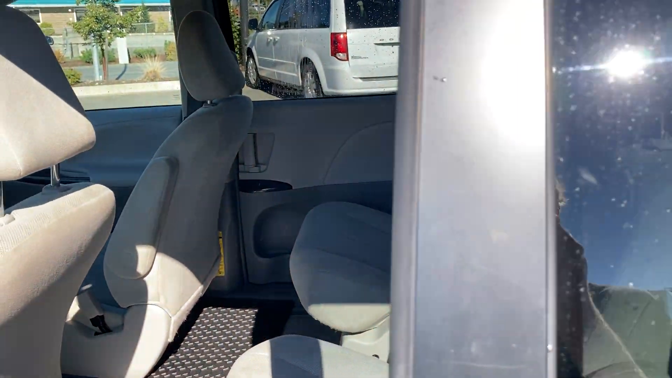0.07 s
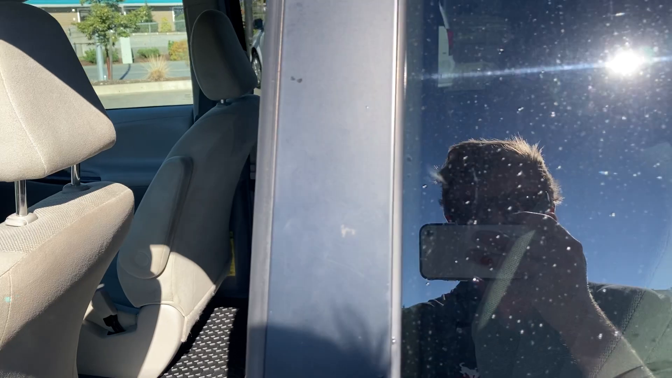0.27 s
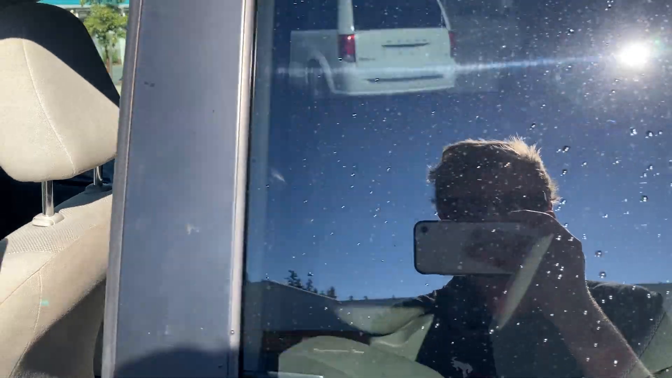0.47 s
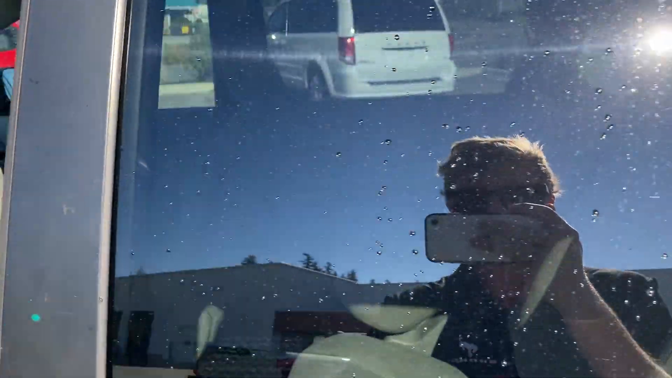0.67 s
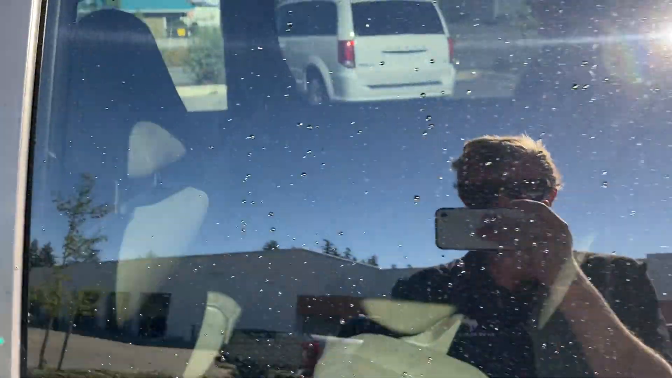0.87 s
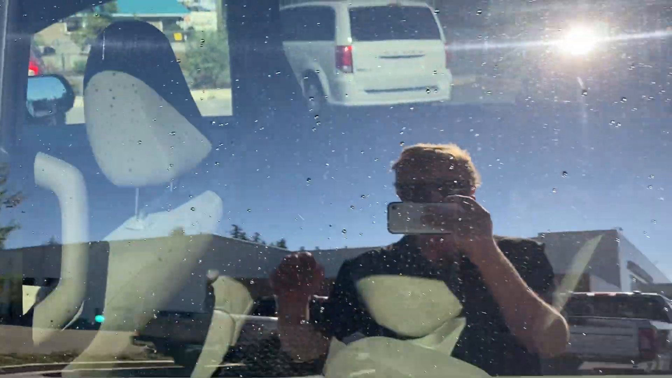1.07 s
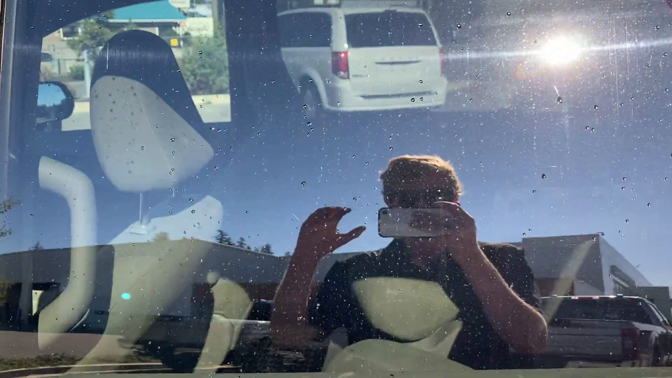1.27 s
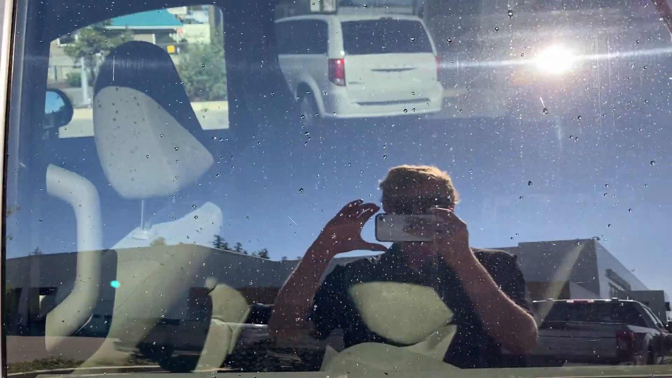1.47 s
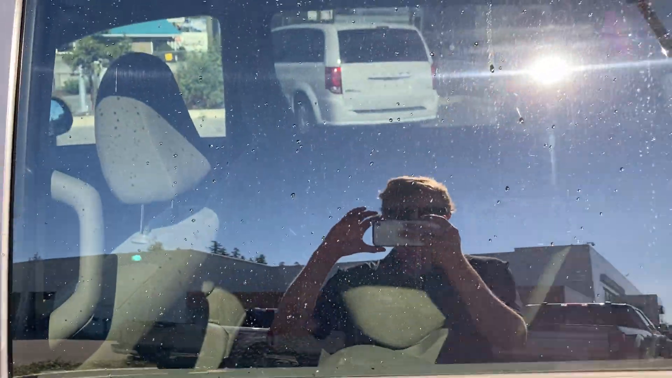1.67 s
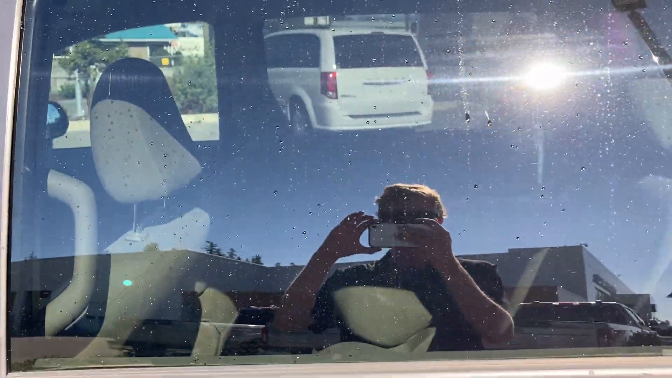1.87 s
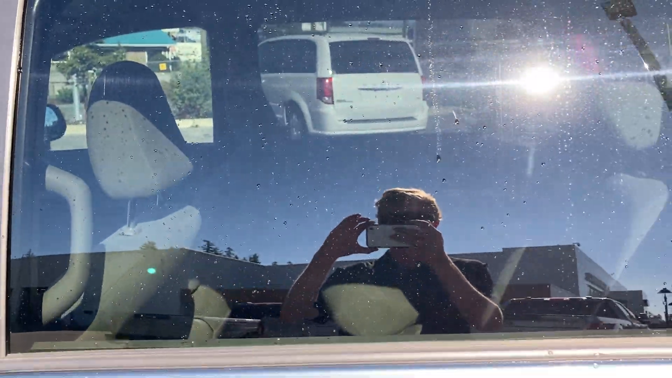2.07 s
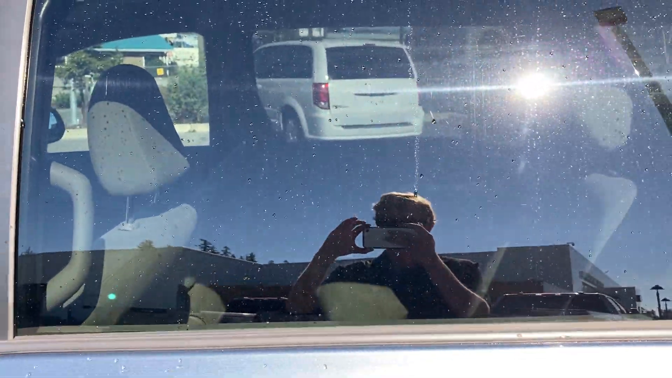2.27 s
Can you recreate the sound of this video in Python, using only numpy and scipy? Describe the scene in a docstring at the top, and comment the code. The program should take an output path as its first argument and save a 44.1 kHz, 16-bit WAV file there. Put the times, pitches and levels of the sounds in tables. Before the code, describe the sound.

A minivan's sliding door rolls along its track close by, rumbling, ticking and bumping, then slams with a latch crunch and a low boom. The cabin's air conditioning rush cuts off, and the engine idles on outside.

```python
"""A close, low rumble: a minivan's sliding door rolls along its track, rasping, ticking and bumping.
The rollers sing in the bend, then the door swings into the frame and slams: seal, striker, latch
and seat in quick turn. The squeezed cabin air booms and a distant wall returns the low end.
The door shuts off the rush of the cabin's air conditioning; the idling engine and its fan
carry on outside."""
import sys
import numpy as np
from scipy.fft import rfft, irfft, next_fast_len
from scipy.io import wavfile
from scipy.ndimage import uniform_filter1d, map_coordinates

SR = 44100
rng = np.random.default_rng(int(sys.argv[2]) if len(sys.argv) > 2 else 0)


def bounce(signal):
    """Save signal as a 16-bit WAV file at the path given by the first command-line argument."""
    frames = np.transpose(np.atleast_2d(signal))
    limited = np.clip(frames, -1, 1)
    pcm = np.round(limited * 32767).astype(np.int16)
    wavfile.write(sys.argv[1], SR, pcm)


N = 101430

# fader ride of the rolling door: t/s, level/dB
ROLL_EFFORT = [(0, -25.5), (.15, -28), (.3, -25.5), (.5, -25), (.62, -22), (.72, -24), (.88, -21.5),
               (1.1, -24)]
# colour of the door's rumble: f/Hz, relative density/dB
RUMBLE_COLOUR = [(25, -54), (42, -6.5), (62, 3.5), (140, -0.5), (280, -0.5), (700, -15), (1400, -30),
                 (6000, -57)]
# resonances of track and door skin under the rollers: f/Hz, width/Hz, relative level/dB
TRACK_RESONANCES = [(104, 12.3, -1), (206.2, 34.4, 3.5), (261.5, 47, 2), (414.5, 28, 2), (449.3, 24, -1),
                    (566, 34, -6)]
# air conditioning through the closing gap: t/s, level/dB
AIRCON_LEVEL = [(0, -46), (.26, -41), (.5, -44), (.85, -38.5), (1.15, -40), (1.45, -85)]
# colour of the air rush as heard, with an EQ notch near 9 kHz: f/Hz, relative density/dB
AIR_RUSH_EQ = [(800, 2.5), (1450, -2.5), (2100, -13), (4000, -17.5), (7500, -28.5), (9200, -38.5),
               (11500, -26), (15500, -58.5)]
# partials of the idle hum: f/Hz, relative level/dB
IDLE_PARTIALS = [(59.2, -44.5), (124, -54.5), (209, -47)]
# colour of the exhaust rumble: f/Hz, relative density/dB
EXHAUST_COLOUR = [(22, -10), (48, 8), (85, 12), (210, 6.5), (300, -6.5), (600, -33)]
# engine fan: t/s, level/dB
FAN_LEVEL = [(0, -41.5), (1.44, -46), (1.72, -39.5), (2.3, -37.5)]
# its colour: f/Hz, relative density/dB
FAN_COLOUR = [(100, -8), (330, -2), (600, -5.5), (830, 2.5), (1030, -9), (1350, -5), (1700, -12.5),
              (4800, -32), (9000, -71)]
# outdoor hiss: t/s, level/dB
HISS_LEVEL = [(1.3, -59), (1.9, -61), (2.21, -58), (2.26, -60)]
# its colour: f/Hz, relative density/dB
HISS_COLOUR = [(1000, -17), (2500, 1.5), (4500, 0), (7000, -4), (9000, -18.5), (15000, -33)]
# resonances of the dry stretch of track: f/Hz, width/Hz, relative level/dB
RASP_RESONANCES = [(534, 82, 5), (1280, 140, 1.5), (1490, 210, -4)]
# ticks of the roller carriage: t/s, level/dB, treble tilt/(dB per octave)
CARRIAGE_TICKS = [(0.29, -44.5, -7.5), (0.758, -45, -3), (0.844, -27.5, -7), (0.956, -44, 11),
                  (1.1156, -42, 2)]
# bright colour of the clicks and latch sizzle, with an EQ notch near 9 kHz: f/Hz, relative density/dB
SIZZLE_EQ = [(1400, -17), (3800, 6.5), (5600, -3), (7500, 9.5), (9200, -13), (10500, 3), (12500, -4.5),
             (15500, -12)]
# door thumps, roller bumps and then the first touch of the seal: t/s, level/dB, f/Hz
DOOR_THUMPS = [(.392, -15, 419), (.905, -6.5, 261), (0.961, -6.5, 307.6), (1.056, -7, 300),
               (1.136, -12, 312)]
# partials of the rollers' song at mid-bend: f/Hz, relative level/dB
BEND_PARTIALS = [(292, 0), (578, -7), (660, -3), (915, -14)]
# knocks of the carriage: t/s, level/dB
CARRIAGE_KNOCKS = [(.959, -30), (1.103, -35), (1.137, -30)]
# mid-heavy colour of a knock or clack: f/Hz, relative density/dB
CLACK_COLOUR = [(100, -15), (350, 6), (700, -1.5), (1400, -2.5), (3300, -11), (4800, -20.5), (7000, -32.5),
                (15000, -49)]
# contacts of the slam: t/s, thud level/dB, thud f/Hz, panel level/dB, clack level/dB, steel level/dB
SLAM_CONTACTS = [(1.147, 3.5, 401, -21, -14.5, -35.5), (1.1676, -9, 207, -38.5, -18.5, -12.5),
                 (1.175, -2, 270, -17, -19.5, -30), (1.188, -8, 398, -19, -18, -12.5),
                 (1.2107, -12, 211, -20.5, -15, -38)]
# door panel modes: f/Hz, relative level/dB
PANEL_MODES = [(159, 1), (201, -3), (237, -4), (316, -6), (364, -4), (437, 0), (541, -5), (642, -8),
               (963, -5), (1092, -8), (1149, -7), (1327, -6), (1438, -6)]
# latch modes: f/Hz, relative level/dB
LATCH_MODES = [(2072, 0), (2520, -2.5), (3133, -3), (4088, -3)]
# resonances of the sprung steel parts: f/Hz, width/Hz, relative level/dB
SPRING_RESONANCES = [(7440, 130, -3), (7910, 150, 1), (9930, 176, -2), (11690, 140, -3)]
# crunches of the latch: t/s, level/dB, centre f/Hz
LATCH_CRUNCHES = [(1.15, -24, 2600), (1.169, -17, 3700), (1.1907, -19, 3700), (1.2127, -20.5, 3700),
                  (1.2185, -20, 3100)]
# modes of the cabin air: f/Hz, level/dB, t60/s
CABIN_MODES = [(58, -5, 0.31), (84, -6.5, 0.22)]
# stereo width: f/Hz, side minus mid level/dB
STEREO_WIDTH = [(60, -19.5), (380, -9.5), (700, -4), (1300, -2), (8000, 1.5)]
# stereo balance: f/Hz, left minus right level/dB
STEREO_BALANCE = [(380, -1.5), (700, 1.7), (2400, 0.5)]


def amp(db):
    """Decibels to gain."""
    return 10 ** (np.asarray(db) / 20)


def along(points, hz):
    """Read a curve of (f/Hz, value) points on a log frequency axis."""
    f, values = np.transpose(points)
    return np.interp(np.log(hz + 1), np.log(f + 1), values)


def clock():
    """Time of every sample in seconds."""
    return np.arange(N) / SR


def fader(points):
    """Gain per sample from (t/s, level/dB) points."""
    return amp(np.interp(clock(), *np.transpose(points)))


def wobble(rate):
    """A smooth random modulator, rate knots a second."""
    return map_coordinates(rng.standard_normal(int(N * rate / SR) + 4), [clock() * rate])


def filtered(x, response):
    """Pass x through a complex frequency response."""
    size = next_fast_len(N + SR // 2)
    return irfft(rfft(x, size) * response(np.fft.rfftfreq(size, 1 / SR)), size)[..., :N]


def spread(pair):
    """Two unrelated signals as mid and side: near-mono bass, wide treble, rms 1."""
    def shares(hz):
        side = amp(along(STEREO_WIDTH, hz))
        return np.array([np.ones_like(side), side]) / np.hypot(1, side)
    mid, side = filtered(pair, shares)
    stereo = np.array([mid + side, mid - side])
    return stereo / np.sqrt(np.mean(stereo ** 2) + 1e-20)


def rush(colour):
    """Coloured stereo noise of rms 1, rolled off above the colour's last point."""
    top_hz = colour[-1][0]
    eq = lambda hz: amp(along(colour, hz)) * (top_hz / np.maximum(hz, top_hz)) ** 2
    return spread(filtered(rng.standard_normal((2, N)), eq))


def rattle(peaks, rough_db):
    """Uneven jolts through (f/Hz, width/Hz, level/dB) resonances, rms 1."""
    jolts = rng.standard_normal((2, N)) * amp(rough_db * wobble(90))
    def body(hz):
        return sum(amp(db) * (1j * hz * width / (centre ** 2 - hz ** 2 + 1j * hz * width)) ** 2
                   for centre, width, db in peaks)
    return spread(filtered(jolts, body))


def blow(start, rise, t60):
    """Envelope of a hit: rounded attack, exponential tail; times in seconds."""
    age = np.maximum(clock() - start, 0)
    return (1 - np.exp(-(age / rise) ** 2)) * amp(-60 * age / t60)


def thud(start, hz, rise, t60):
    """A heavily damped swing at one pitch."""
    return blow(start, rise, t60) * np.sin(2 * np.pi * hz * (clock() - start))


def ring(start, modes, t60, rise):
    """Struck metal: the lowest mode rings for t60, higher ones less; loose fittings drift the phases."""
    damping, looseness = .28, 2.7  # power of frequency; radians per root second
    t, onset = clock()[:SR // 2], round(start * SR)
    out = np.zeros((2, N + SR))
    for hz, db in modes:
        life = t60 * (modes[0][0] / hz) ** damping
        phase = rng.uniform(0, 2 * np.pi)
        splay = np.arctan(amp(along(STEREO_WIDTH, hz)) / 2) * rng.choice([-1, 1])
        drift = looseness * np.cumsum(rng.standard_normal(len(t))) / np.sqrt(SR)
        stereo_phase = uniform_filter1d(phase + np.array([[splay], [-splay]]) + drift, size=200)
        envelope = amp(db + rng.normal(0, 1.5) - 60 * t / life) * (1 - np.exp(-t / rise))
        out[:, onset:onset + len(t)] += envelope * np.sin(2 * np.pi * hz * t + stereo_phase)
    return out[:, :N]


def roller_rumble(stop_s=1.265, fade_s=.048):
    """The rollers shake track and door skin until the door comes to rest."""
    effort = fader(ROLL_EFFORT) * np.clip((stop_s - clock()) / fade_s + 1, 0, 1)
    rumble = amp(-2.5) * rush(RUMBLE_COLOUR) * amp(.406 * wobble(35.7))
    track = amp(-4.5) * rattle(TRACK_RESONANCES, rough_db=1.5)
    return effort * (rumble + track)


def air_conditioning():
    """Cabin air rushes through the gap and fades as the door seals it."""
    return fader(AIRCON_LEVEL) * rush(AIR_RUSH_EQ)


def idling_engine():
    """A wavering hum over low exhaust rumble and the rush of the fan."""
    hum = 0
    for hz, db in IDLE_PARTIALS:
        peak = np.sqrt(2) * amp(db + 2.8 * wobble(6.4))
        hum += peak * np.sin(2 * np.pi * hz * clock() + wobble(9))
    exhaust = amp(-38) * rush(EXHAUST_COLOUR)
    fan = fader(FAN_LEVEL) * rush(FAN_COLOUR)
    return amp(-1) * hum + exhaust + fan


def outdoor_hiss():
    """A faint, airy bed under the scene."""
    return fader(HISS_LEVEL) * rush(HISS_COLOUR)


def roller_rasp(middle_s=.26, half_length_s=.075):
    """The rollers scrape over a dry stretch of track."""
    swell = np.exp(-((clock() - middle_s) / half_length_s) ** 2)
    return amp(-39.5) * swell * rattle(RASP_RESONANCES, rough_db=4.5)


def carriage_ticks():
    """The roller carriage gives tiny clicks, each with its own brightness."""
    out = np.zeros((2, N))
    for start, db, tilt in CARRIAGE_TICKS:
        colour = [(hz, density + tilt * np.log2(hz)) for hz, density in SIZZLE_EQ]
        out += amp(db) * blow(start, rise=.00093, t60=.041) * rush(colour)
    return out


def door_thumps():
    """Roller bumps, then the first touch of the seal, set the door swinging for a few cycles."""
    return sum(amp(db) * thud(start, hz, rise=.0038, t60=.062) for start, db, hz in DOOR_THUMPS)


def bend_song(middle_s=.97, half_length_s=.058, sag_per_s=.22):
    """The rollers sing in the bend at the track's end, the pitch sinking as the door slows."""
    t = clock() - middle_s
    phase_per_hz = 2 * np.pi * np.cumsum(1 - sag_per_s * t) / SR
    song = sum(amp(db + 2.6 * wobble(39.82)) * np.sin(hz * phase_per_hz + .31 * wobble(45.1))
               for hz, db in BEND_PARTIALS)
    swell = np.exp(-(t / half_length_s) ** 2)
    return amp(-27) * swell * song


def carriage_knocks():
    """The carriage knocks in the bend and as the door swings in."""
    hits = sum(amp(db) * blow(start, rise=.0028, t60=.11) for start, db in CARRIAGE_KNOCKS)
    return hits * rush(CLACK_COLOUR)


def latch_sizzle(left_lag_s=.00008, direct_share=.5):
    """Sizzle of the latch's sprung steel; it sits to the right, so its direct sound reaches left late."""
    left, right = rush(SIZZLE_EQ) + amp(-6) * rattle(SPRING_RESONANCES, rough_db=1.5)
    direct = filtered(right, lambda hz: np.exp(-2j * np.pi * hz * left_lag_s))
    return np.array([np.sqrt(1 - direct_share ** 2) * left + direct_share * direct, right])


def slam():
    """Each contact thuds, rings the panel, shakes the trim and clatters in the latch."""
    out = np.zeros((2, N))
    clack, rumble, sizzle = rush(CLACK_COLOUR), rush(RUMBLE_COLOUR), latch_sizzle()
    fresh = lambda noise: np.roll(noise, rng.integers(N // 3), axis=1)  # a new stretch for each hit
    for start, thud_db, thud_hz, panel_db, clack_db, steel_db in SLAM_CONTACTS:
        out += amp(thud_db) * thud(start, thud_hz, rise=.0051, t60=.053)
        panel = ring(start, PANEL_MODES, t60=.3, rise=.002)
        trim_shudder = amp(5) * blow(start, rise=.004, t60=.25) * fresh(rumble)
        out += amp(panel_db) * (panel + trim_shudder)
        out += amp(clack_db - 13.5) * ring(start, LATCH_MODES, t60=.13, rise=.001)
        grain = amp(1.4 * wobble(350))
        out += amp(clack_db) * blow(start, rise=.003, t60=.105) * grain * fresh(clack)
        chatter = blow(start, rise=.0034, t60=.05) + amp(-15.5) * blow(start, rise=.00311, t60=.16)
        out += amp(steel_db) * chatter * fresh(sizzle)
    return out


def latch_crunch(width_hz=2300, grit_db=3, grit_per_s=900):
    """The claw grinds over the striker in short crunches, each with a faint after-rattle."""
    out = np.zeros((2, N))
    for start, db, hz in LATCH_CRUNCHES:
        envelope = blow(start, rise=.002, t60=.04) + amp(-26) * blow(start, rise=.002, t60=.4)
        grit = amp(grit_db * wobble(grit_per_s))
        out += amp(db) * envelope * grit * rattle([(hz, width_hz, 0)], rough_db=-1.5)
    return out


def cabin_boom(seated_s=1.2, rise_s=.012):
    """The seated door pumps the cabin air, and the van's body shakes itself still."""
    push = -sum(amp(db) * thud(seated_s, hz, rise_s, t60) for hz, db, t60 in CABIN_MODES)
    body_shake = amp(-24) * blow(seated_s, rise_s, t60=.6) * rush(RUMBLE_COLOUR)
    return push + body_shake


def wall_echo(x, delay_s=.24, corner_hz=232):
    """A distant wall returns the low end as one dull slap."""
    late_and_dull = lambda hz: np.exp(-2j * np.pi * hz * delay_s) / (1 + 1j * hz / corner_hz) ** 2
    return amp(-24.5) * filtered(x, late_and_dull)


def scene():
    """Slide, slam and echo over the steady beds; lows lean right, mids lean left."""
    slide = roller_rumble() + roller_rasp() + carriage_ticks()
    slide += door_thumps() + bend_song() + carriage_knocks()
    shut = slam() + latch_crunch() + cabin_boom()
    beds = air_conditioning() + idling_engine() + outdoor_hiss()
    pan = lambda hz: amp(along(STEREO_BALANCE, hz) * np.array([[.5], [-.5]]))
    return filtered(slide + shut + wall_echo(shut) + beds, pan)


def record(dry):
    """A soft clip rounds the peaks, then a brick-wall low-pass trims the top."""
    ceiling, top_hz = .95, 16000
    soft = dry / (1 + np.abs(dry / ceiling) ** 6) ** (1 / 6)
    return filtered(soft, lambda hz: hz < top_hz)


dry = scene()
out = record(dry)
bounce(out)
```